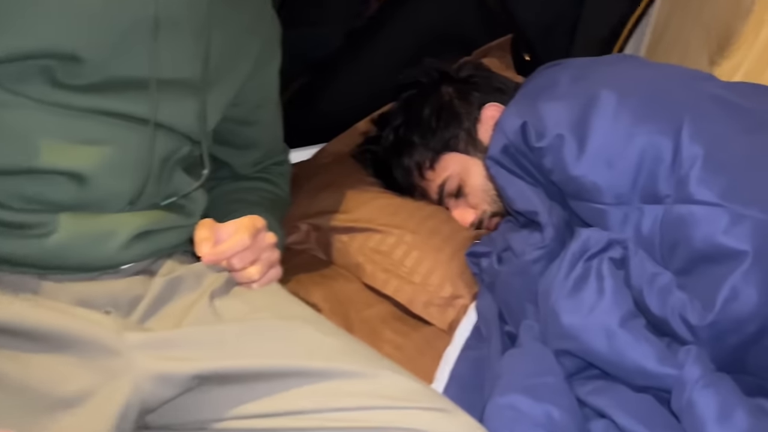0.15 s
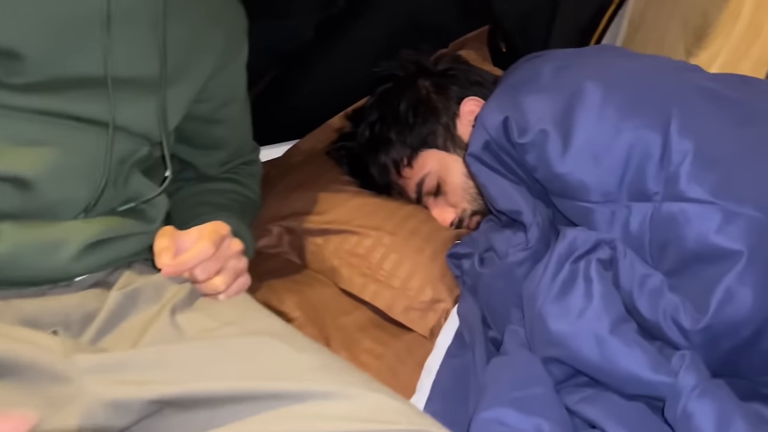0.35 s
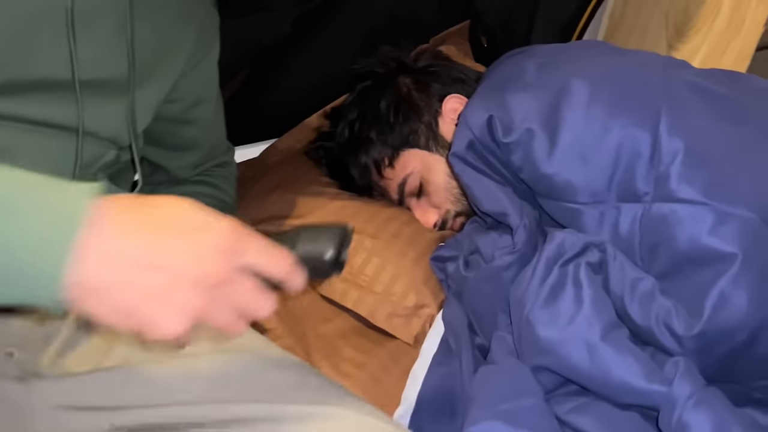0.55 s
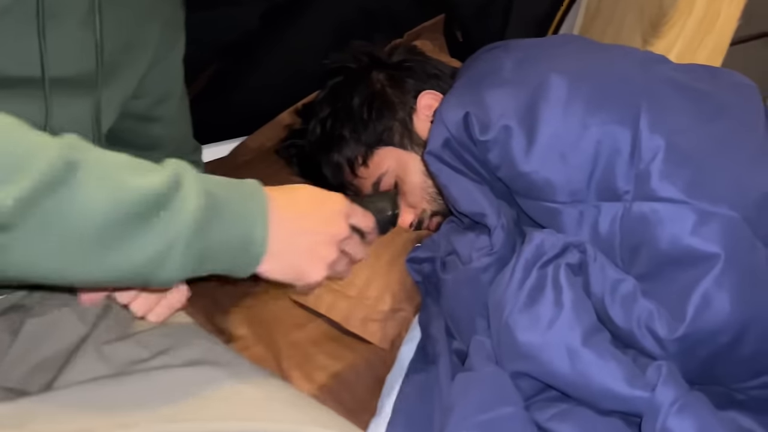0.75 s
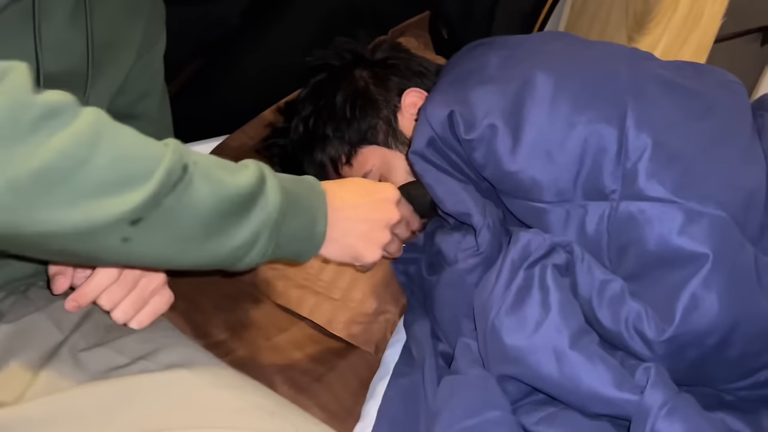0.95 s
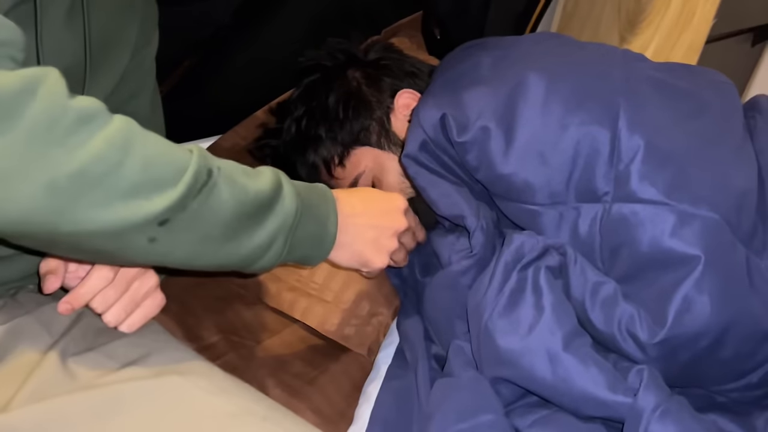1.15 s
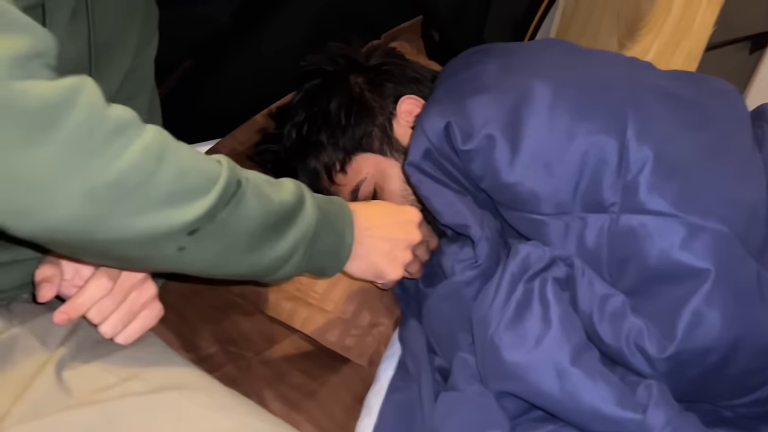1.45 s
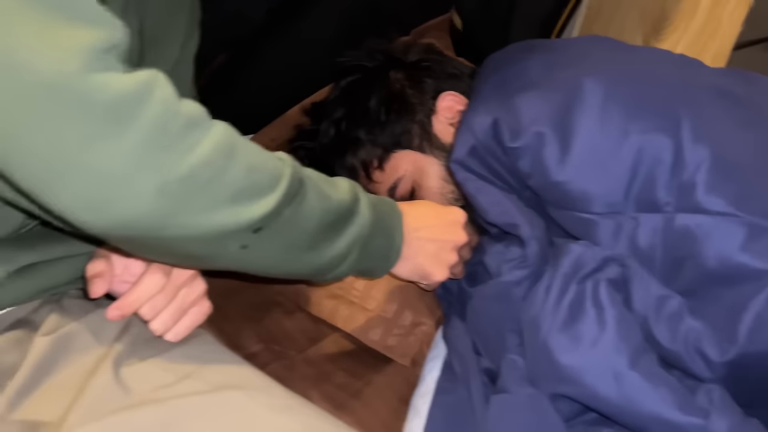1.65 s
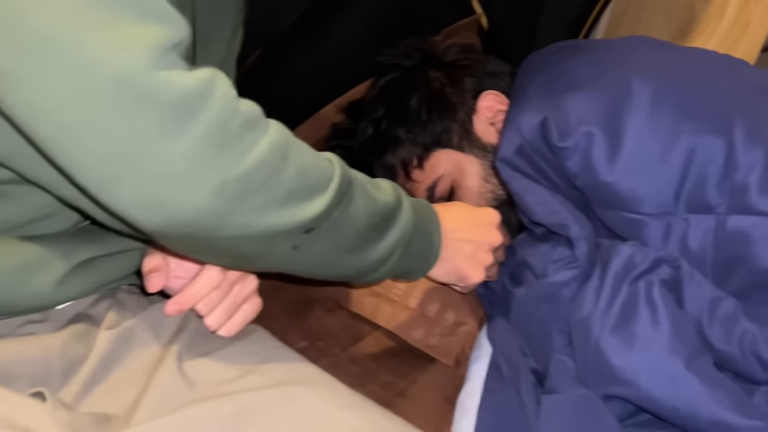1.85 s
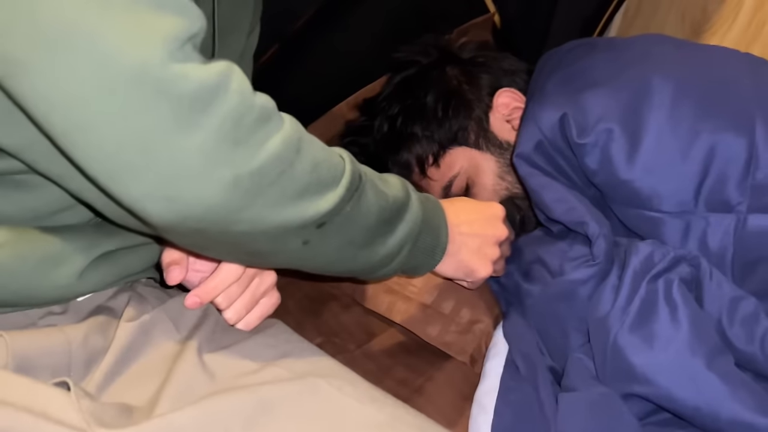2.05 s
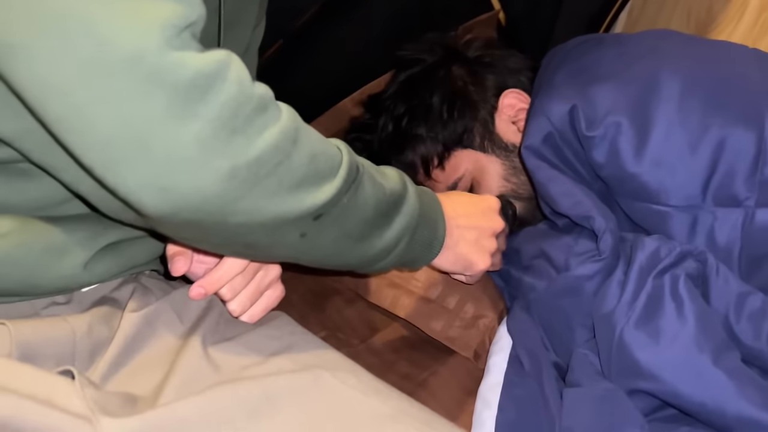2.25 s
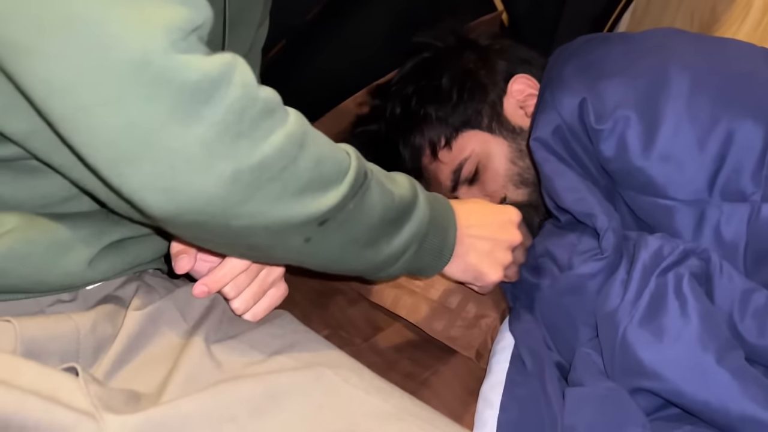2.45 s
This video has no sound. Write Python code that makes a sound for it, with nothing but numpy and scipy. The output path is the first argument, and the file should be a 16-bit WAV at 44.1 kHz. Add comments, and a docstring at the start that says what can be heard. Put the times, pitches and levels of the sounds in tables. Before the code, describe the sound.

A small electric trimmer clicks on almost at once and buzzes with a raspy hiss, swings past a close phone microphone, then grows rough and crackly in beard hair before smoothing out, in a quiet bedroom.

```python
"""In a quiet bedroom a small motor-driven trimmer is switched on, swung past a phone's microphone pair,
pressed into a beard and lifted off. The buzz is a series of multiples of the motor speed, knocked on by the cam;
the hiss is noise swelling twice a turn as the blade scrapes. Hairs in the teeth snap as short rings and shake
the rhythm. Switch clicks, room air and a low rumble that swells as the phone moves complete the scene."""
import sys
import numpy as np
from scipy import signal
from scipy.io import wavfile
from scipy.ndimage import uniform_filter1d

SR = 44100
rng = np.random.default_rng(int(sys.argv[2]) if len(sys.argv) > 2 else 0)


def transcribe(u):
    """Save the signal u as a 16-bit wav file named by the first command-line argument.

    u: samples, shape (n,) or (channels, n), limited to [-1, 1]; the rate is SR.
    q: integer samples, one column per channel.
    """
    v = np.clip(np.atleast_2d(u).T, -1, 1)
    q = np.round(v * 32767).astype(np.int16)
    wavfile.write(sys.argv[1], SR, q)


def field_ratio(decibels):
    """Amplitude ratio for a level in dB (20 dB per decade); scalars and array-likes work."""
    return 10 ** (np.asarray(decibels, dtype=float) / 20)


N = 114660

# rotation of the motor, loaded by hair in the teeth: (t/s, f/Hz)
MOTOR_SPEED = [(.17, 74.02), (0.21, 76.6), (0.28, 82), (0.35, 83.6), (0.414, 84.37), (0.474, 84.13),
               (0.5, 81.87), (0.602, 80.64), (0.678, 81.25), (0.702, 82.4), (0.956, 81.5), (1.042, 83.27),
               (1.212, 84), (1.35, 86.48), (1.422, 84.95), (1.57, 84.03), (1.65, 80.4), (1.85, 84.05),
               (2.1, 81.95), (2.3, 77.9), (2.36, 79.76), (2.418, 83.1), (2.494, 84.5), (2.6, 84.96)]
START_S, SPIN_UP_S = 0.16, 0.053
WOBBLE_TURNS, SHAKE_TURNS = .0006, 0.025  # rms timing error: always, and added at full load
# grip and distance: (t/s, buzz level/dB, hiss level/dB, buzz left-right/dB, hiss left-right/dB, top tilt/dB)
HAND = [(0.22, -47.5, -54, 2, -4, 5), (0.24, -45.5, -50, 3.5, -6.5, 2.5), (.37, -44, -45.5, 0, -8, -0.5),
        (0.45, -44, -48, -1.5, -10.5, 1), (0.52, -46, -49, -3.5, -9, 4.5),
        (0.7, -45.5, -51.5, -2.5, -11.5, 2.5), (0.82, -48, -52, -3, -6.5, 2.5),
        (0.9, -50, -51.5, -1.5, -13.5, -0.5), (1.07, -48.5, -56, -4.5, -11.5, 3),
        (1.15, -48, -58, -3.5, -11, 6), (1.35, -48, -54.5, -4, -6, 2), (1.43, -51.5, -55.5, -6, -10.5, 2.5),
        (1.49, -49, -58, -4, -10.5, 5), (1.6, -46, -54, -3.5, -9, 3), (2.13, -47.5, -52, -8.5, -10.5, 4.5),
        (2.25, -47, -51, -6, -9.5, 1.5), (2.49, -50, -54.5, -10.5, -11, 2.5),
        (2.6, -47.5, -56.5, -7.5, -15, 6.5)]
# hair in the teeth: (t/s, load 0-1)
HAIR_LOAD = [(.17, 0.43), (.225, 0.8), (.27, 0.13), (.5, 0.01), (1.55, 0), (1.61, 0.94), (1.8, 0.6),
             (2., 0.93), (2.26, 0.6), (2.42, 0), (2.6, 0.07)]
# attitude of the trimmer: (t/s, pose: 0 close by, 1 swinging over, 2 at the beard, 3 lifted off)
POSE = [(.46, 0.), (.56, 1.), (.78, 1.), (.88, 1.8), (1.05, 2.), (1.4, 2.), (1.5, 2.5), (2.3, 2.5),
        (2.38, 3.)]

# relative spectrum of one turn's knocks, close by: (multiple of motor speed, level/dB)
KNOCK_CLOSE = [(1, -11), (2, -25), (3, -19), (4, -25), (5, -16), (6, -33), (7, -22), (8, -30), (9, -17),
               (10, -16), (11, -4), (12, -15), (13, -13), (14, -20), (15, -14), (16, -16), (17, -11),
               (18, -10), (19, -11), (20, 0), (21, -7), (22, -6), (23, -19), (24, -20), (25, -18), (26, -6),
               (27, -7), (28, -1), (29, -9), (30, -5), (31, -15), (32, -5), (33, -25), (34, -17), (35, -17),
               (36, -13), (37, -20), (38, -6), (39, -7), (40, -5)]
# the same, swinging over: (multiple of motor speed, level/dB)
KNOCK_SWUNG = [(1, -13), (2, -23), (3, -19), (4, -23), (5, -23), (6, -33), (7, -32), (8, -39), (9, -26),
               (10, -28), (11, -13), (12, -18), (13, -21), (14, -25), (15, -13), (16, -24), (17, -22),
               (18, -11), (19, -10), (20, -3), (21, -9), (22, 0), (23, -13), (24, -8), (25, -18), (26, -5),
               (27, -12), (28, -5), (29, -13), (30, -8), (31, -16), (32, -15), (33, -26), (34, -16),
               (35, -23), (36, -23), (37, -22), (38, -26), (39, -25), (40, -19)]
# the same, at the beard: (multiple of motor speed, level/dB)
KNOCK_BEARD = [(1, -10), (2, -26), (3, -21), (4, -33), (5, -23), (6, -34), (7, -30), (8, -36), (9, -20),
               (10, -19), (11, -9), (12, -19), (13, -20), (14, -30), (15, -12), (16, -19), (17, -22),
               (18, -10), (19, -7), (20, 0), (21, -17), (22, -10), (23, -21), (24, -14), (25, -14),
               (26, -2), (27, -20), (28, -3), (29, -8), (30, -7), (31, -15), (32, -18), (33, -25),
               (34, -24), (35, -31), (36, -29), (37, -32), (38, -24), (39, -28), (40, -26)]
# the same, lifted off: (multiple of motor speed, level/dB)
KNOCK_LIFTED = [(1, -15), (2, -22), (3, -23), (4, -32), (5, -19), (6, -34), (7, -29), (8, -26), (9, -20),
                (10, -19), (11, -12), (12, -18), (13, -23), (14, -22), (15, -12), (16, -13), (17, -17),
                (18, -8), (19, -6), (20, 0), (21, -5), (22, -11), (23, -18), (24, -18), (25, -14),
                (26, -10), (27, -17), (28, -9), (29, -14), (30, -18), (31, -18), (32, -17), (33, -24),
                (34, -22), (35, -22), (36, -27), (37, -34), (38, -26), (39, -26), (40, -24)]
SMEAR_TURNS = .14  # lead of the highest multiple; the lower ones lead less
WANDER_RAD, WAVER_DB = .35, 1.8  # rms straying of each multiple in phase and level
SHAFT_DB, DAMP_DB = -18, -9  # change of the four lowest multiples; of all knocks at full load

# resonances of the casing: (f/Hz, width of the first of two stages/Hz, relative level/dB)
CASING_MODES = [(350, 350, -19.5), (672, 400, -13), (1043, 263, -1), (1546, 170, 1.5), (1770, 300, 0),
                (2253, 160, 0.5)]
RATTLE_DB = -15.  # scrape noise in the casing
SNAPS_PER_S, CLUMP_DB = 450, 3.  # small snaps; rms swing in level, hairs coming into the teeth in tufts
# the loudest snaps: (t/s, level/dB, f/Hz)
LOUD_SNAPS = [(1.592, -32.5, 1692), (1.605, -34.5, 1030), (1.633, -33, 1578), (1.66, -34.5, 2150),
              (1.694, -34, 1760), (1.714, -40, 1905), (1.733, -37, 1045), (1.75, -33, 1700),
              (1.802, -48, 1678), (1.922, -35, 1572), (1.967, -39, 1606), (2.002, -41, 1544),
              (2.072, -50, 1620), (2.145, -35, 1882), (2.184, -33.5, 1088), (2.218, -31.5, 1649)]
SNAP_T60_S, PING_RISE_S = .016, .001

# relative spectrum of the blade close by: (f/Hz, level/dB per Hz)
BLADE_CLOSE = [(1710, -34), (2900, -16), (3250, 4), (3580, -1.5), (4370, 2.5), (4650, -0.5), (5060, 1.5),
               (6340, -0.5), (6950, -8.5), (8650, -3), (9480, -16), (11200, -6.5), (13200, -15.5),
               (14100, -8), (14400, -41), (14800, -20), (15600, -33)]
# relative spectrum of the blade far off: (f/Hz, level/dB per Hz)
BLADE_DISTANT = [(1710, -9), (2900, 3.5), (3090, -11.5), (3460, -1.5), (3690, -5.5), (4650, 0.5),
                 (4990, 3.5), (5430, -1.5), (6120, 6), (6810, -8.5), (7200, -10.5), (8120, -2),
                 (9350, -9.5), (10700, -1.5), (12200, -15.5), (13900, -10.5), (15600, -17)]
SCRAPE_TURNS, SCRAPE_BED = 0.043, 0.36  # decay to 1/e; steady part
SECOND_DB, SECOND_TURNS = -6.5, .48  # weaker second scrape of each turn
REPEAT = .55  # power share of the scrape that unloaded teeth repeat alike on every turn
TICK_DB, TICK_CLOSE_DB, TICK_SPREAD_DB = -17., 9., 2.5  # the blade's reversal stands out close by
TICK_HZ, TICK_WIDTH_HZ, TICK_LEAD_TURNS = 5050, 800, .15  # ring of the blade as it reverses
# left-right balance of the highest hiss: (t/s, level/dB)
TOP_BALANCE = [(0.22, -4.5), (1.43, -1), (1.52, -3), (2.6, -2)]
TOP_HZ, TOP_FLICKER_DB = 10000, 7.5  # lower edge; rms flicker of the balance
HUM_DB, HUM_CLOSE_DB, HUM_HZ, HUM_WIDTH_HZ = -71, 4.5, 244, 172

# phase by which the left port leads as the hand crosses: (t/s, phase/rad)
PORT_PHASE = [(.2, 1), (.45, 1.03), (.6, 0.55), (.9, 0.66), (1.1, -0.25), (1.55, -0.78), (1.7, -0.83),
              (2.6, -1.04)]
ROOM_T60_S, ROOM_GAP_S = 0.46, 0.00067
BUZZ_ROOM_DB, HISS_ROOM_DB = -6.5, -1.5

# switch under the thumb: (t/s, level/dB)
SWITCH_CLICKS = [(.087, -50), (0.177, -63)]
# vibration modes of the switch: (f/Hz, relative level/dB, t60/s)
CLICK_MODES = [(1030, -1.5, 0.012), (2510, -3.5, 0.0075), (3620, -15, 0.0081)]

# relative spectrum of the rumble: (f/Hz, level/dB per Hz)
RUMBLE_SPECTRUM = [(18, -48), (30, -15.5), (49, -3), (96, -5), (172, -21.5), (190, -35), (450, -26),
                   (580, -69), (990, -120)]
# swell of the rumble: (t/s, level/dB)
RUMBLE_SWELL = [(0.0, -60), (0.14, -61.5), (0.15, -66.5), (0.6, -57.5), (0.81, -62), (0.85, -56.5),
                (0.93, -61.5), (1.22, -62), (1.24, -56), (1.93, -76), (2.06, -66), (2.52, -72.5),
                (2.58, -58), (2.6, -74)]
# relative spectrum of the room air: (f/Hz, level/dB per Hz)
AIR_SPECTRUM = [(88, -20), (150, -17.5), (249, -16), (327, -31), (711, -28.5), (1670, -26), (7920, -43.5),
                (11700, -40.5), (13700, -53), (15600, -16)]
AIR_DB = -70.5
RUMBLE_SAME, AIR_SAME, RUMBLE_PAN_DB = 0.94, 0.079, -1.5  # correlation of the ports; left-right balance


def trimmer():
    """Common excitation: one cam times the buzz of the casing and the hiss of the blade."""
    load = curve(HAIR_LOAD)
    far = np.clip(curve(POSE) / 2, 0, 1)
    running = np.clip((np.arange(N) / SR - START_S) / SPIN_UP_S, 0, 1) ** 2
    turns = cam_turns(load)
    scrape = blade_scrape(turns)
    noise = evened((SCRAPE_BED + scrape) * rng.standard_normal(N))

    buzz = casing_buzz(turns, load, noise) * field_ratio(curve(HAND)) * running + loud_snaps()
    hiss = blade_hiss(turns, load, far, scrape, noise)
    low, top = (signal.sosfilt(signal.butter(6, TOP_HZ, kind, fs=SR, output="sos"), hiss)
                for kind in ("low", "high"))
    hiss_gain = field_ratio(curve(HAND, axis=2)) * running
    sound = place(buzz, curve(HAND, axis=3), BUZZ_ROOM_DB)
    sound += place(low * hiss_gain, curve(HAND, axis=4), HISS_ROOM_DB)
    return sound + flickering_top(top * hiss_gain) + running * body_hum(far)


def cam_turns(load):
    """Integration of rotational speed gives the turns made; the timing errors grow with the load."""
    steady = np.cumsum(curve(MOTOR_SPEED)) / SR
    return steady + (WOBBLE_TURNS + SHAKE_TURNS * load) * drift(hz=64.2)


def casing_buzz(turns, load, noise):
    """Forced vibration: cam knocks, damped by hair, with noise and small snaps ringing the casing's modes."""
    buzz = field_ratio(DAMP_DB * load) * knocks(turns, curve(POSE))
    buzz += field_ratio(RATTLE_DB) * casing(noise)
    snaps = (rng.random(N) < SNAPS_PER_S / SR).astype(float)
    return buzz + field_ratio(CLUMP_DB * drift(hz=12.5)) * load * casing(snaps)


def knocks(turns, pose):
    """Fourier series of one turn, in minimum phase, as a struck casing whose low rings come late."""
    levels = np.array([KNOCK_CLOSE, KNOCK_SWUNG, KNOCK_BEARD, KNOCK_LIFTED])[:, :, 1].T
    mean = levels.mean(1) * np.log(10) / 20
    # the log spectrum is mirrored about 0 Hz before the Hilbert transform
    mirrored = np.r_[mean[0], mean, np.full(len(mean) + 1, mean.min()), mean[::-1]]
    phase = -signal.hilbert(mirrored).imag[1:]
    out = np.zeros(N)
    for k, (row, p) in enumerate(zip(levels, phase), 1):
        db = np.interp(pose, range(4), row) + WAVER_DB * drift(hz=8.1) + SHAFT_DB * (k < 5)
        angle = 2 * np.pi * k * (turns + SMEAR_TURNS * k / len(mean))
        out += field_ratio(db) * np.cos(angle + p + WANDER_RAD * drift(hz=5.8))
    return out / np.sqrt(abs(uniform_filter1d(out ** 2, size=4410)))  # near-constant short-term rms


def casing(x):
    """Modal superposition: each resonance is two stages in cascade, the second twice as wide."""
    modes = [field_ratio(db) * ring(ring(x, hz, width), hz, 2 * width) for hz, width, db in CASING_MODES]
    return evened(sum(modes))


def loud_snaps():
    """Free decay: each loud snap of hair is one short damped ring."""
    return sum(ping(*row, SNAP_T60_S) for row in LOUD_SNAPS)


def blade_scrape(turns):
    """Amplitude modulation: two decaying scrapes of the blade in every turn of the cam."""
    scrape = np.zeros(N)
    for at, db in ((0, 0), (SECOND_TURNS, SECOND_DB)):
        since = (turns + TICK_LEAD_TURNS - at) % 1
        scrape += field_ratio(db) * np.exp(-since / SCRAPE_TURNS)
    return scrape


def blade_hiss(turns, load, far, scrape, noise):
    """Friction noise: random and repeated scrape with ticks, filtered by a spectrum that follows the distance."""
    pattern = np.interp(turns % 1, np.linspace(0, 1, 400), rng.standard_normal(400))
    teeth = evened((SCRAPE_BED + scrape) * pattern)
    alike = REPEAT * (1 - load)
    drive = np.sqrt(1 - alike) * noise + np.sqrt(alike) * teeth + reversal_ticks(scrape, far)
    drive = signal.sosfilt(signal.butter(6, 2750, "high", fs=SR, output="sos"), drive)
    return (1 - far) * evened(colour(drive, BLADE_CLOSE)) + far * evened(colour(drive, BLADE_DISTANT))


def reversal_ticks(scrape, far):
    """Impulse response: each onset of a scrape sets off the ring of the reversing blade."""
    onsets = np.diff(scrape, prepend=9) > .1
    ticks = onsets * field_ratio(TICK_SPREAD_DB * rng.standard_normal(N))
    ticks = evened(ticks + 20 * ring(ticks, TICK_HZ, TICK_WIDTH_HZ))
    return ticks * field_ratio(TICK_DB + TICK_CLOSE_DB * (1 - far))


def flickering_top(top):
    """Random panning: the left-right balance of the highest hiss flickers at random from moment to moment."""
    balance = curve(TOP_BALANCE) + TOP_FLICKER_DB * drift(hz=14.2)
    return top * field_ratio(curve(HAND, axis=5) + balance * np.array([[.5], [-.5]]))


def body_hum(far):
    """Resonant noise: low shiver of the running trimmer in hand and bedding, stronger close by."""
    shiver = ring(rng.standard_normal(N), HUM_HZ, HUM_WIDTH_HZ)
    shiver = evened(ring(shiver, HUM_HZ, HUM_WIDTH_HZ))
    return field_ratio(HUM_DB + HUM_CLOSE_DB * (1 - far)) * shiver


def switch():
    """Free vibration: each of two small plastic clicks is a sum of damped modes."""
    return sum(ping(s, db + d, hz, t60) for s, db in SWITCH_CLICKS for hz, d, t60 in CLICK_MODES)


def low_rumble():
    """Coherent noise: a low rumble, nearly alike at both ports, swells as the phone moves."""
    balance = field_ratio(RUMBLE_PAN_DB * np.array([[.5], [-.5]]))
    return wash(RUMBLE_SPECTRUM, RUMBLE_SAME) * field_ratio(curve(RUMBLE_SWELL)) * balance


def room_air():
    """Diffuse noise: steady room air, almost independent at the two ports."""
    return field_ratio(AIR_DB) * wash(AIR_SPECTRUM, AIR_SAME)


def place(x, pan_db, room_db):
    """Two-port reception: level and phase differences, with walls and bedding returning opposite signs."""
    direct = []
    for side in (1, -1):
        turned = (signal.hilbert(x) * np.exp(.5j * side * curve(PORT_PHASE))).real
        direct.append(turned * field_ratio(side * pan_db / 2))
    t = np.arange(SR // 5) / SR
    echoes = np.sign(rng.standard_normal(len(t))) * (rng.random(len(t)) < .05)  # sparse
    taps = echoes * field_ratio(-60 * t / ROOM_T60_S) * (t > ROOM_GAP_S)
    room = signal.fftconvolve(x, taps / np.linalg.norm(taps))[:N]
    return np.array(direct) + field_ratio(room_db) * np.array([[1], [-1]]) * room


def wash(points, same):
    """Partial coherence: coloured noise of rms 1, partly shared by both microphones."""
    a, b = (evened(colour(rng.standard_normal(N), points)) for _ in range(2))
    return np.array([a, same * a + np.sqrt(1 - same ** 2) * b])


def ping(s, db, hz, t60):
    """Exponential decay: one damped ring from time s, with a short linear rise."""
    t = np.maximum(np.arange(N) / SR - s, 0)
    decay = field_ratio(db - 60 * np.minimum(t / t60, 3))
    return decay * np.sin(2 * np.pi * hz * t) * np.minimum(t / PING_RISE_S, 1)


def ring(x, hz, width):
    """Simple resonance of peak gain 1."""
    return signal.lfilter(*signal.iirpeak(hz, hz / width, SR), x)


def colour(x, points):
    """Minimum-phase principle: a causal filter built from a spectrum alone."""
    f, db = np.transpose(points)
    bins = np.log(abs(np.fft.fftfreq(4096, 1 / SR)) + 1)
    log = np.interp(bins, np.log(f), db, -70, -70) * np.log(10) / 20
    taps = np.fft.ifft(np.exp(np.conj(signal.hilbert(log)))).real
    return signal.oaconvolve(x, taps)[:N]


def drift(hz):
    """Low-passed noise: smooth chance up to hz, rms 1."""
    noise = rng.standard_normal(N + SR)
    return evened(signal.lfilter(*signal.butter(2, hz, fs=SR), noise)[SR:])  # drops the settling


def curve(rows, axis=1):
    """Linear interpolation over time of one column of a table."""
    rows = np.array(rows)
    return np.interp(np.arange(N) / SR, rows[:, 0], rows[:, axis])


def evened(x):
    """Normalisation of mean power: scales to rms 1."""
    return x / np.sqrt(np.mean(x ** 2) + 1e-20)


def scene():
    """Linear superposition of trimmer, switch, rumble and room air."""
    return trimmer() + switch() + low_rumble() + room_air()


def band_limit(x):
    """A steep low-pass at the top of the band."""
    return signal.sosfilt(signal.butter(12, 15800, fs=SR, output="sos"), x)


def record(dry):
    """High-pass response: the microphone loses the deepest bass."""
    thin = signal.sosfilt(signal.butter(3, 38., "high", fs=SR, output="sos"), dry)
    return band_limit(thin)


dry = scene()
out = record(dry)
transcribe(out)
```